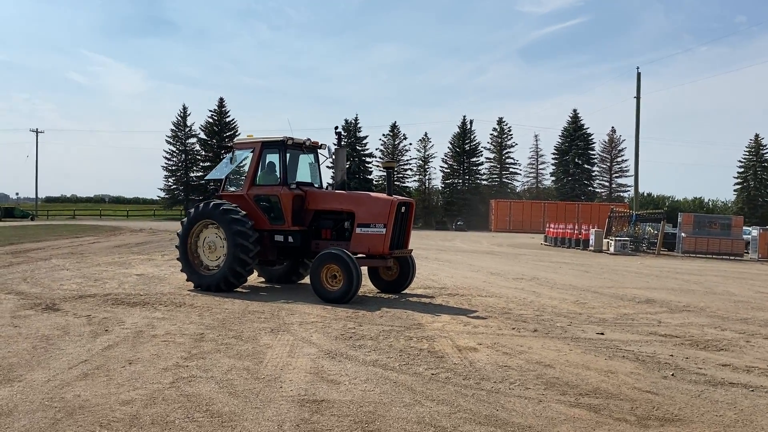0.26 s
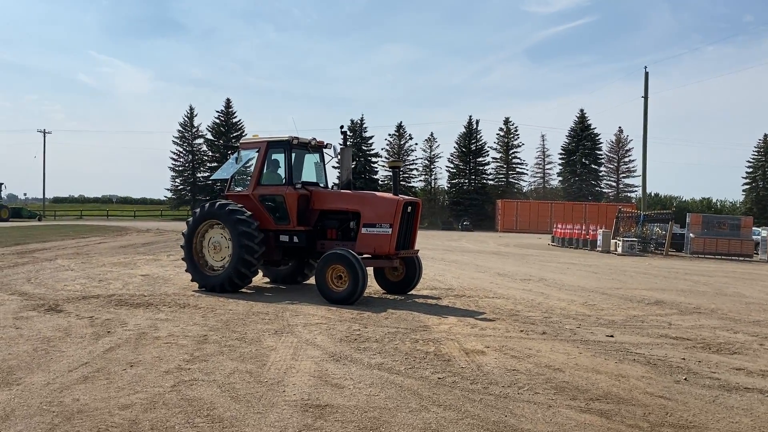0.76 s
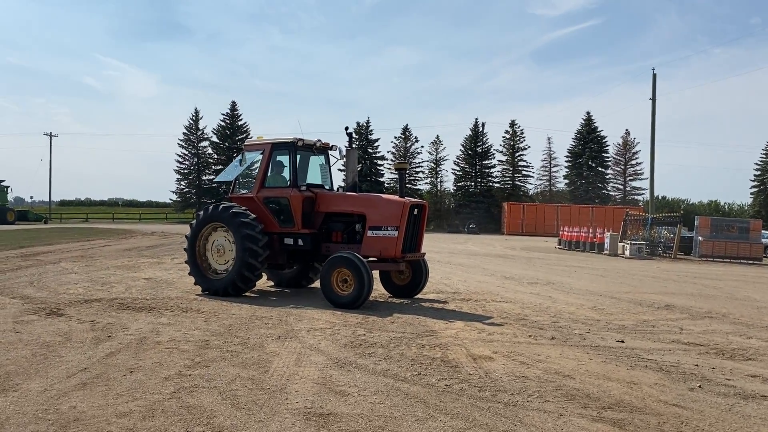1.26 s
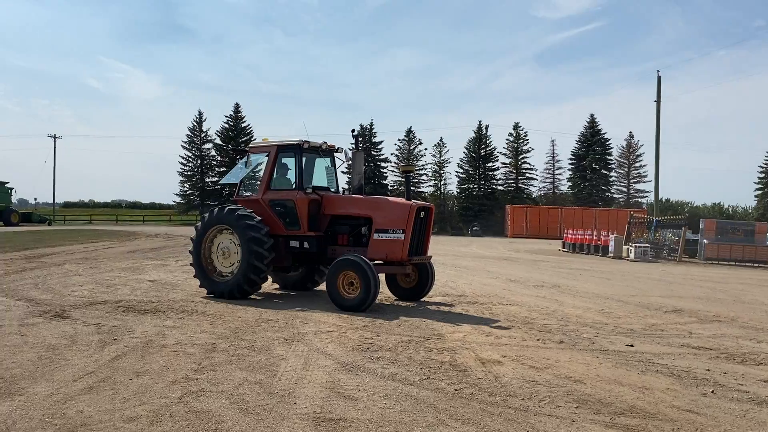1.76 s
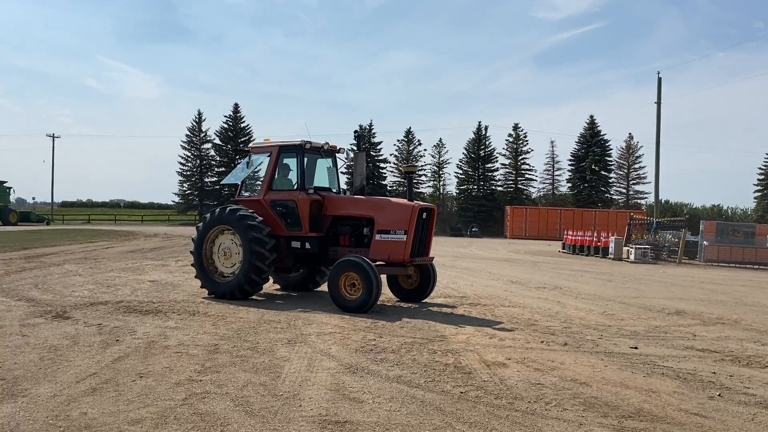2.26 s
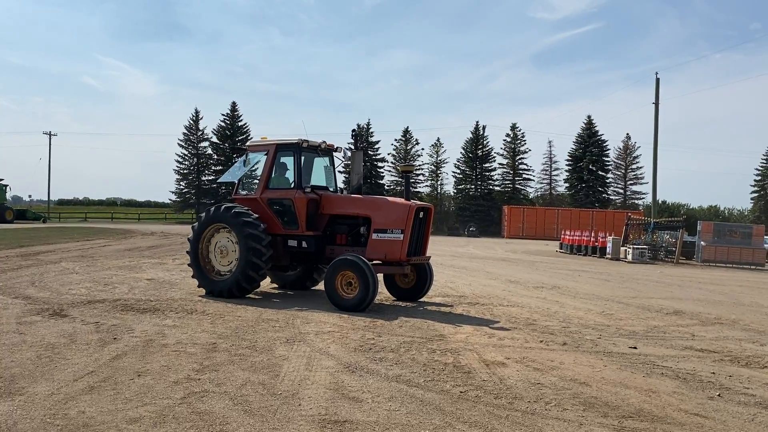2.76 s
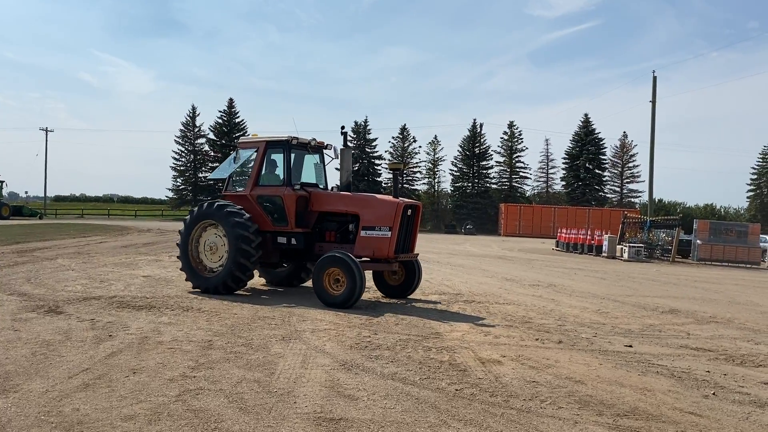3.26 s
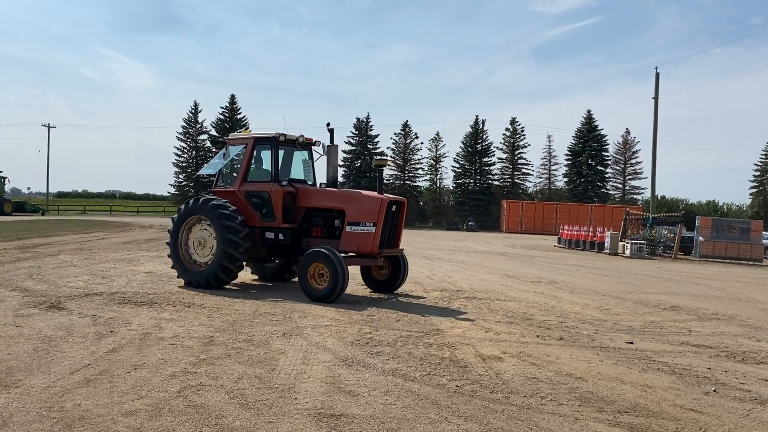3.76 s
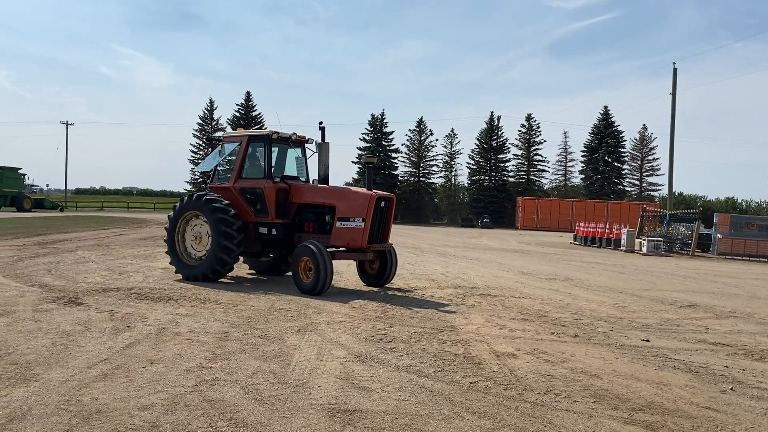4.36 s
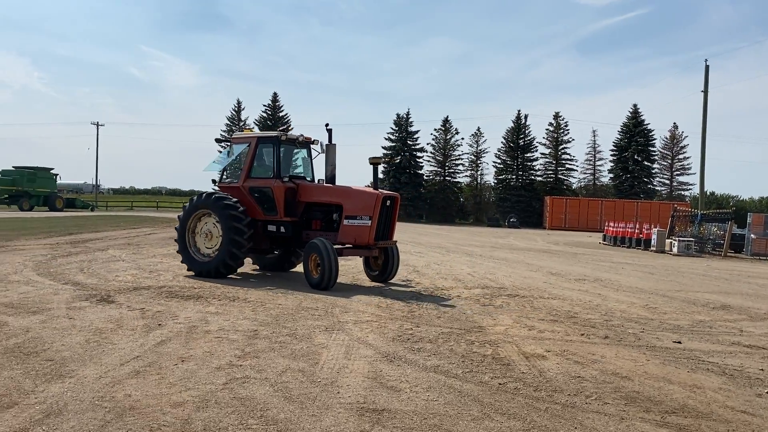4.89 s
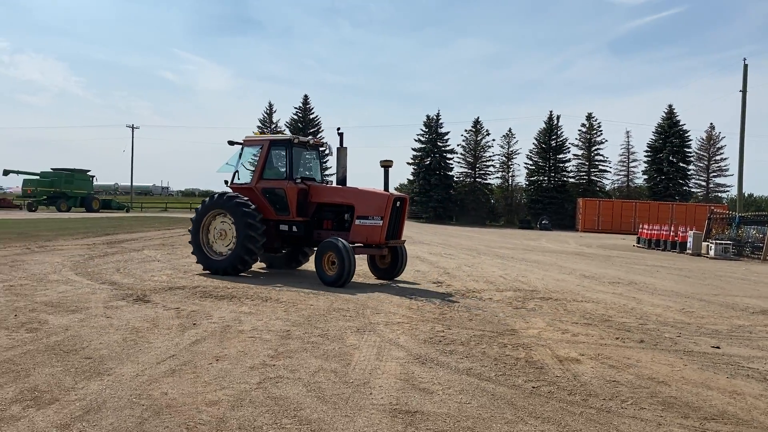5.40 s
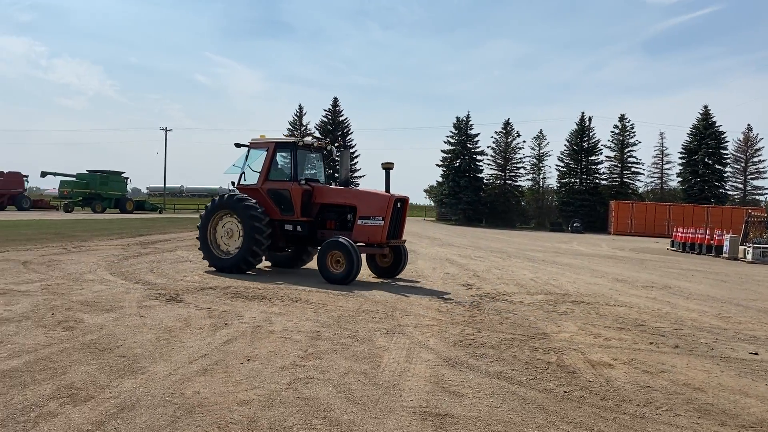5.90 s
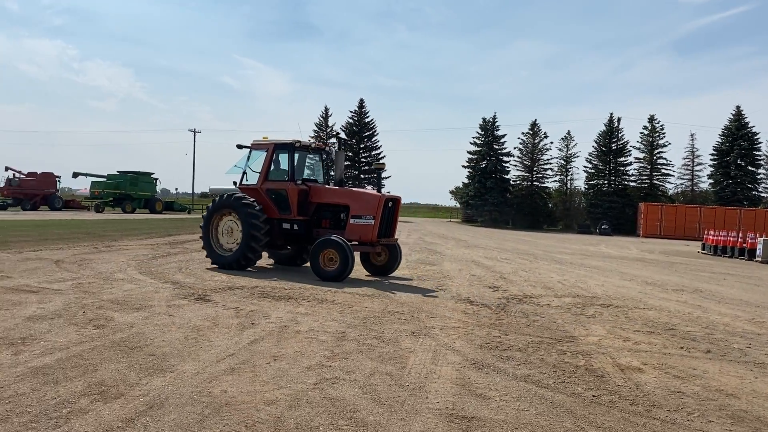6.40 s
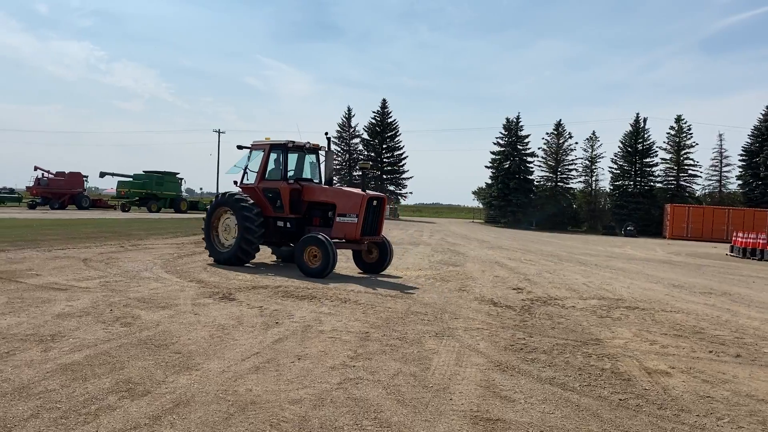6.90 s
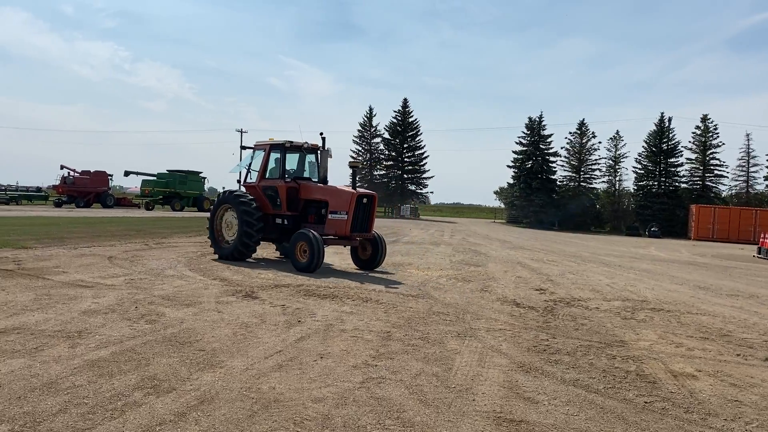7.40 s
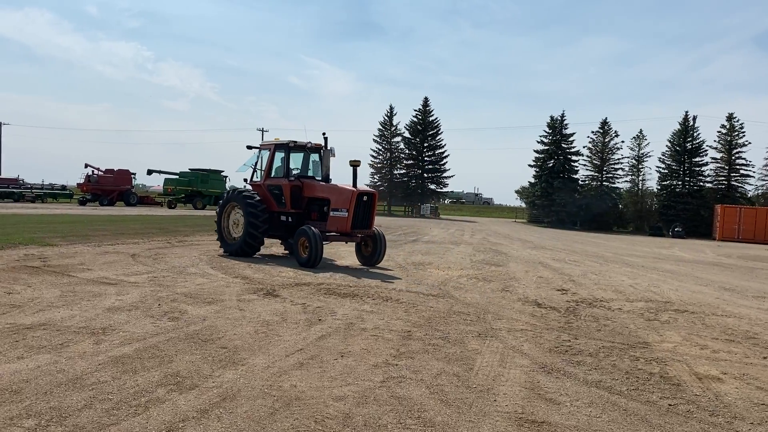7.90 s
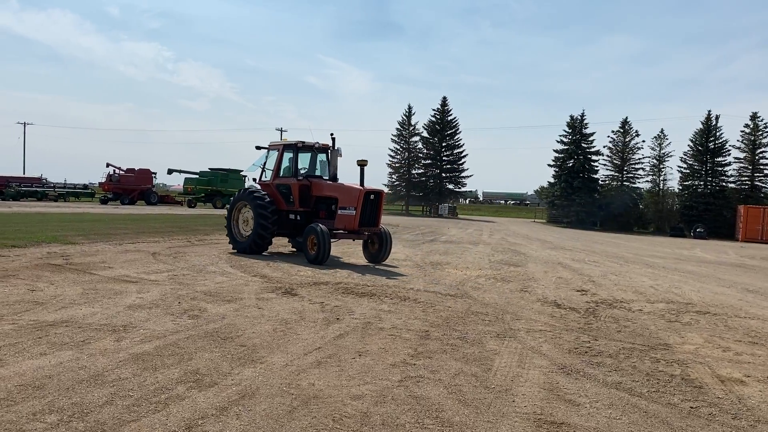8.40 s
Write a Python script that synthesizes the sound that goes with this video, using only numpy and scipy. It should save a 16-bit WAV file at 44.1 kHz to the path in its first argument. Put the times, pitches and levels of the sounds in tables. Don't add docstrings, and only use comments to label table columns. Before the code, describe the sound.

A six-cylinder diesel tractor creeps over a dirt yard, some way from a hand-held stereo microphone. Rapid knocking, valve clatter, exhaust beat and gear whine run throughout, with a buzzy loose cover early. Wind builds to a heavy low boom before four seconds, then the bass is suddenly cut. The engine continues thinner, with ticking, air knocks and fluttering gusts, fading a little at the end.

```python
import sys
import numpy as np
from scipy import signal
from scipy.fft import rfft, irfft, next_fast_len
from scipy.io import wavfile
from scipy.ndimage import uniform_filter1d, minimum_filter1d, map_coordinates

SR = 44100
rng = np.random.default_rng(int(sys.argv[2]) if len(sys.argv) > 2 else 0)


def waveform_to_disk(signal):
    frames = np.transpose(np.atleast_2d(signal))
    scaled = np.clip(frames, -1, 1) * 32767
    samples = np.round(scaled).astype(np.int16)
    wavfile.write(sys.argv[1], SR, samples)


def how_loud(loudness_db):
    steps = np.asarray(loudness_db, float) / 20
    return 10 ** steps


N = 381465


def unit(x):
    return x / np.sqrt(np.mean(x ** 2) + 1e-20)


def along(points, hz):
    f, v = np.transpose(points)
    return np.interp(np.log(hz + 1), np.log(f + 1), v)


def curves(rows, t=None):
    seconds, *columns = np.transpose(rows)
    if t is None:
        t = np.arange(N) / SR
    return [np.interp(t, seconds, column) for column in columns]


def step(s, length, before_db, after_db):
    return curves([(s, before_db), (s + length, after_db)])[0]


def bumps(rows):
    t = np.arange(0, N / SR + .01, .002)
    swells = sum(db * np.exp(-((t - s) / half) ** 2) for s, half, db in rows)
    return np.interp(np.arange(N) / SR, t, swells)


def wobble(rate, count=2000):
    knots = np.linspace(0, N * rate / SR, count)
    smooth = map_coordinates(rng.standard_normal(int(N * rate / SR) + 4), [knots])
    return np.interp(np.arange(N) * rate / SR, knots, smooth)


def filtered(x, response):
    m = next_fast_len(N + 8192)
    return irfft(rfft(x, m) * response(np.fft.rfftfreq(m, 1 / SR)), m)[..., :N]


def coloured(x, spectrum):
    return unit(filtered(x, lambda hz: how_loud(along(spectrum, hz))))


def resonance(hz, centre, width):
    return 1j * hz * width / (centre * centre - hz * hz + 1j * hz * width)


def ring(modes):
    return lambda hz: 1 + sum(how_loud(db) * resonance(hz, c, w) for c, w, db in modes)


# time in seconds, rate in cycles per second.
CYCLE_RATE = [(0, 12.94), (2, 12.93), (2.4, 12.78), (3.1, 12.2), (3.3, 12.14), (3.6, 12.23), (4, 12.26),
              (4.3, 12.2), (4.9, 12.27), (5.15, 12.36), (5.6, 12.33), (6.15, 12.4), (6.75, 12.42),
              (7.1, 12.36), (7.55, 12.82), (8, 12.78), (8.65, 12.96)]
# time in seconds, level in dB.
ENGINE_LEVEL = [(0, -25.5), (.15, -25.5), (.65, -23.5), (1.2, -24.5), (2.5, -23.5), (4, -23), (4.5, -24.5),
                (5.3, -24), (5.5, -26.5), (6.3, -25), (6.75, -25), (7.23, -26), (7.6, -25), (7.93, -27.5),
                (8.45, -28), (8.65, -29)]
# time in seconds, share from 0 to 1.
TURN = [
    (0, 0),
    (.6, 0),
    (2.3, 0.38),
    (3.2, 0.53),
    (4.5, 0.9),
    (6, 0.96),
    (8.65, 0.1),
]
# time in seconds, level in dB.
MOVING_AIR = [(.14, -0.5), (.77, 1), (1.61, 1), (4.19, -2.5), (4.48, 0.5), (5.28, 0.5), (5.35, -1.5),
              (5.61, 3.5), (6.31, -2.5), (6.58, 1.5), (6.74, -3), (7.03, -3), (7.33, 2), (7.39, -2),
              (7.61, -6), (8.31, -1), (8.58, 1)]


def tractor():
    cycle = np.cumsum(curves(CYCLE_RATE)[0]) / SR
    turn = np.clip(curves(TURN)[0], 0, 1)
    block_db = curves(ENGINE_LEVEL)[0]
    mean_db = block_db.mean()
    air_db = bumps([(s, .069, db) for s, db in MOVING_AIR])
    treble_db = mean_db + 0.99 * (block_db - mean_db) + air_db
    block = how_loud(block_db + 2.0) * block_knock(cycle, turn)
    clatter = how_loud(treble_db - 9 + 0.65 * wobble(9)) * valve_clatter(cycle, turn)
    hiss = how_loud(treble_db - 22.5 + 0.72 * wobble(7.6)) * firing_hiss(cycle)
    notes = tones(cycle) * [[1], [-.45]]
    return block + clatter + hiss + notes + rattles(cycle) + tappet(cycle)


def fresh():
    return rng.standard_normal((2, N))


def repeating(cycle, drift, size=2048, count=6):
    morph = np.arange(N) / SR * drift % (count - 1)
    phase = np.angle(rfft(rng.standard_normal((count, size))))
    tables = irfft(np.exp(1j * phase), size)
    return unit(map_coordinates(tables, [morph, cycle % 1 * size], order=1, mode="grid-wrap"))


def steady(cycle, drift):
    return np.array([repeating(cycle, drift), repeating(cycle, drift)])


CYLINDER_DB = [-10.5, -10, -8.5, -18.5, -12.5, -8]


def knocks(cycle, late, sharp, base, scatter_db):
    firing = cycle * len(CYLINDER_DB) + late
    k = firing.astype(int)
    chance_db = scatter_db * rng.standard_normal(N // 400)[k]
    size = how_loud(np.array(CYLINDER_DB)[k % len(CYLINDER_DB)] + chance_db)
    return base + size * np.exp(-sharp * (firing % 1))


# frequency in Hz, ratio in dB.
REPEATS = [(300, -2), (700, 2), (1500, 3.5), (2100, 0), (2800, -5)]
# centre in Hz, width in Hz, level in dB.
PANELS = [(336, 69, -10), (767, 54, -9.5), (903, 60, -7.5), (1033, 150, -10), (1190, 70, -4.5),
          (1302, 48, -3.5), (1641, 24, -11)]
# frequency in Hz, level in dB per Hz.
BLOCK_FIRST = [(30, -45), (65, -6), (150, 3), (235, 0), (340, -1.5), (620, -5), (900, -4.5), (1250, -4),
               (1500, -8.5), (1950, -6.5), (2250, -10.5), (2650, -10), (2950, -22.5), (4500, -39)]
# frequency in Hz, level in dB per Hz.
BLOCK_SECOND = [(30, -45), (65, -8), (150, 0), (235, -4), (340, -7.5), (620, -4.5), (800, -3), (1250, -3.5),
                (1600, -3), (1950, -5.5), (2250, -9), (2650, -11.5), (2950, -18), (4500, -44)]


def block_knock(cycle, turn):
    def share(sign):
        return lambda hz: 1 / np.sqrt(1 + how_loud(-2 * sign * along(REPEATS, hz)))

    noise = filtered(steady(cycle, .85), share(1)) + filtered(fresh(), share(-1))
    block = noise * knocks(cycle, .3, sharp=3, base=.4, scatter_db=1.3)
    block = filtered(block, ring(PANELS))
    return (1 - turn) * coloured(block, BLOCK_FIRST) + turn * coloured(block, BLOCK_SECOND)


# centre in Hz, width in Hz, level in dB.
COVERS = [
    [(4400, 410, 4.5), (6100, 150, 0)],
    [(4410, 120, 5.5), (4690, 140, 7.5), (6460, 710, -2.5)],
]
# frequency in Hz, level in dB per Hz.
CLATTER = [(2000, 0.5), (2700, 0), (3500, -3), (4400, -6), (5400, -3), (6200, -9.5), (7000, -13.5),
           (8200, -22), (9500, -36)]


def valve_clatter(cycle, turn):
    noise = .3 * steady(cycle, .45) + .95 * fresh()
    clatter = noise * knocks(cycle, 2.4, sharp=3, base=.55, scatter_db=3.5)
    first, second = (filtered(clatter, ring(cover)) for cover in COVERS)
    return coloured((1 - turn) * first + turn * second, CLATTER)


# frequency in Hz, level in dB per Hz.
HISS = [(7000, -17.5), (7800, -1), (10000, -6), (12000, -15.5), (14000, -11), (15200, -16), (15800, -38)]


def firing_hiss(cycle):
    return coloured(fresh() * knocks(cycle, 5.55, sharp=2.6, base=0.54, scatter_db=6.5), HISS)


def heard(comes, leaves, before_db, facing_db, after_db):
    swing = 0.36
    return curves([(comes, before_db), (comes + swing, facing_db),
                   (leaves, facing_db), (leaves + swing, after_db)])[0]


def order_note(cycle, order, db, sway_db):
    level = np.sqrt(2) * how_loud(db + sway_db * wobble(2.6))
    return level * np.sin(2 * np.pi * (order * cycle + rng.random()))


EXHAUST_ORDERS = [5, 6, 7, 10, 13, 16, 20, 26, 27]
EXHAUST_DB = [-65, -26.5, -40, -44, -39.5, -39, -41.5, -37.5, -39.5]
# comes in s, leaves in s, level before in dB, facing in dB and after in dB.
BEAT_HEARD = (1, 3.5, -22, 1.5, -8)
FAN_HEARD = (0.5, 3, -21, -22, -37.5)
GEAR_HEARD = (4.4, 6.2, -42, -33.5, -46)
PIPE_HEARD = (2.5, 4, -58, -38, -50)
# order, comes in seconds, leaves in seconds, level in dB rms.
WHINES = [(32, -1, 2.4, -44), (52, -1, 2.2, -45), (55, -1, 2.4, -45), (65, 3.3, 4.8, -39),
          (123, .6, 2.4, -44), (123, 4.8, 6.2, -43), (44, -1, 2.4, -44), (62, -1, 2.3, -41),
          (67, -1, 2.4, -43), (69, -1, 2.5, -40), (70, 2.5, 4.9, -40), (74, -1, 2.6, -40),
          (75, 3, 4.5, -43), (81, 2.4, 3.1, -41), (81, 4.8, 7.2, -43), (86, 2.6, 6, -40), (89, -1, 6, -44),
          (90, 4.8, 6.6, -42), (91, -1, 2, -43), (93, -1, 2.6, -38), (95, 2.6, 3.9, -41),
          (96, 2.6, 5.8, -40), (98, -1, 4.8, -41), (99, 2.2, 5.8, -38), (99, 7, 7.7, -39),
          (100, -1, 2, -43), (101, 5, 5.9, -40), (104, 2.6, 6.6, -40), (105, -1, 2.2, -42),
          (106, 2.6, 6.2, -42), (107, 2.6, 5, -42), (108, 5, 6.2, -42), (111, 6, 7.1, -41),
          (117, 5.8, 6.8, -41), (132, 2.6, 4.9, -41)]


def tones(cycle):
    beat_db = heard(*BEAT_HEARD)
    fan_db = heard(*FAN_HEARD)
    exhaust = sum(order_note(cycle, k, db + beat_db * (k < 8), 1.5)
                  for k, db in zip(EXHAUST_ORDERS, EXHAUST_DB))
    fan = sum(order_note(cycle, 11.82 * (k + 1), fan_db + db, .5)
              for k, db in enumerate([0, -21, -23]))
    whine = sum(order_note(cycle, k, heard(comes, leaves, db - 16, db, db - 16), 1.5)
                for k, comes, leaves, db in WHINES)
    gear = order_note(cycle, 72, heard(*GEAR_HEARD), 2.0)
    pipe = order_note(cycle, 48, heard(*PIPE_HEARD), 1.0)
    return exhaust + whine + fan + gear + pipe


# centre in Hz, width in Hz.
RATTLES = [(4240, 210), (4480, 240)]
# comes in s, leaves in s, level before in dB, facing in dB, after in dB.
RATTLES_HEARD = [
    (.45, 2.9, -68, -42.5, -60),
    (4.6, 5.95, -63, -40.5, -47.5),
]
# centre in seconds, half length in seconds, change in dB.
RATTLE_SWELLS = [
    (.78, 0.087, 5),
    (1.08, .08, 4),
    (1.42, .15, 4.5),
    (1.85, .06, -3),
    (2.05, .1, 1),
    (2.27, .06, -3),
    (2.6, 0.067, 6),
    (5.27, 0.054, 4),
    (5.42, .07, -6),
]


def rattles(cycle):
    out = 0
    for (centre, width), row in zip(RATTLES, RATTLES_HEARD):
        shake = fresh() * knocks(cycle, 2.4, sharp=2.1, base=0.39, scatter_db=4.5)
        buzz = unit(filtered(shake, lambda hz: resonance(hz, centre, width)))
        out = out + how_loud(heard(*row) + bumps(RATTLE_SWELLS) + 0.76 * wobble(10.0)) * buzz
    return out


# time in seconds, level in dB.
TAPPET_HEARD = [
    (4.9, -60),
    (5.15, -42.5),
    (5.3, -48),
    (5.4, -58),
    (5.55, -43),
    (5.95, -40.5),
    (6.15, -45),
    (6.4, -60),
]


def tappet(cycle):
    since = (cycle - cycle[round(5.715 * SR)]) % 1
    burst = fresh() * np.exp(-14 * since) * how_loud(2.7 * wobble(12))
    return how_loud(curves(TAPPET_HEARD)[0]) * unit(filtered(burst, lambda hz: resonance(hz, 4490, 150)))


# frequency in Hz, coherence from 0 to 1.
ALIKE = [(60, 0.48), (600, 0.89), (2000, 0.81), (3500, 0.99), (5000, 0.77), (7000, 1), (8200, 0.92),
         (15000, 0.51)]
# frequency in Hz, left minus right in dB.
TILT = [(60, 10.5), (110, 3), (200, 1), (380, 0), (700, -0.5), (1290, 0), (2380, -2), (4400, 3),
        (8120, 3.5), (15000, -3)]
# frequency in Hz, left's lead in radians.
LEAD = [(0, 0), (1500, .1), (2800, 1.5), (4100, 1.2), (5400, 2.5), (6250, .75), (7100, -.6), (8000, -2.9),
        (8700, -3.4), (9650, -6.2), (10600, -6.4), (11400, -9.2), (12700, -9.6), (13300, -12.4),
        (14600, -12.7), (15200, -15.7)]


def ports(pair):
    def angle(hz):
        return np.arccos(np.clip(along(ALIKE, hz), 0, 1)) / 2

    def half(hz):
        return how_loud(along(TILT, hz) / 2) * np.exp(.5j * np.interp(hz, *np.transpose(LEAD)))

    mid, side = filtered(pair, lambda hz: np.array([np.cos(angle(hz)), np.sin(angle(hz))]))
    left_right = np.array([mid + side, mid - side])
    return filtered(left_right, lambda hz: np.array([half(hz), 1 / half(hz)]))


# time in seconds, level in dB.
WIND = [(0, -54), (.45, -39), (.8, -32), (1.4, -25.5), (3.1, -23), (3.45, -13.5), (3.86, -12.5),
        (4.02, -23.5), (5.5, -22), (6.25, -20), (6.9, -26.5), (7.2, -16), (7.76, -21.5), (7.84, -28),
        (7.87, -21), (8.65, -22)]
# centre in seconds, half length in seconds, change in dB.
GUSTS = [(0, .03, 22), (.57, .07, 7.5), (1.1, 0.063, 6.5), (1.17, 0.044, -13), (2.33, 0.055, -9),
         (3.29, 0.014, -6), (3.36, 0.05, -2.5), (3.47, .06, -5), (3.57, .02, -5), (3.61, 0.027, 0),
         (3.84, .05, 1.5), (4.04, 0.13, 6.5), (4.39, 0.049, 3), (4.73, 0.07, 3), (4.97, 0.014, 5.5),
         (5.11, 0.026, 3.5), (5.265, 0.05, 11), (5.4, 0.086, 7), (5.575, 0.021, -11), (5.635, .035, 9),
         (5.715, 0.01, 6), (5.78, .04, -4), (5.86, 0.021, 7), (5.93, 0.016, 8), (6.02, 0.024, 7),
         (6.14, 0.038, 7), (7.54, 0.057, 7.5), (7.66, .02, 1)]
# frequency in Hz, level in dB per Hz.
RUMBLE = [(20, -30), (40, 4.5), (65, 4.5), (120, -0.5), (200, -3), (400, -17.5), (800, -76)]
# frequency in Hz, level in dB per Hz.
FLUTTER = [(80, -43), (160, -4), (300, 6), (480, 1.5), (650, -5.5), (1000, -17.5), (2000, -23), (3500, -65)]
# time in seconds, left minus right in dB.
WINDWARD = [
    (0, -14),
    (3, -3.5),
    (3.7, 2),
    (4.5, 0),
    (7, 1),
    (7.6, 3.5),
    (8.65, 13),
]


def wind():
    strength_db = curves(WIND)[0] + bumps(GUSTS)
    rumble_db = strength_db + step(3.87, .04, -1.5, -9.5)
    flutter_db = strength_db + step(3.45, .34, -23.5, -4)
    rumble = how_loud(rumble_db) * buffet(RUMBLE, 40, lump_db=1.5, apart=.35)
    flutter = how_loud(flutter_db) * buffet(FLUTTER, 130, lump_db=2.5, apart=.4)
    balance = how_loud(curves(WINDWARD)[0] * [[.5], [-.5]])
    return (rumble + flutter + thumps()) * balance + pops()


def buffet(spectrum, rate, lump_db, apart):
    a, b = (how_loud(lump_db * wobble(rate)) * rng.standard_normal(N) for _ in "ab")
    return coloured(np.array([a + apart * b, a - apart * b]), spectrum)


# centre in seconds, peak in dB, frequency in Hz.
THUMPS = [(3.362, -4, 80), (3.384, -10, 92), (3.412, -13, 135), (3.54, -9, 125), (3.606, -6.5, 294),
          (3.620, -8, 280), (3.676, -13, 310), (3.706, -9, 90), (3.74, -13, 90), (3.75, -10, 350),
          (3.807, -7, 95), (3.834, -12, 115), (3.857, -6, 125), (3.859, -5, 280), (3.877, -17, 400),
          (5.215, -10, 300), (5.255, -12, 400), (5.272, -8, 430), (5.292, -10, 426), (5.364, -13, 400),
          (5.380, -10, 560), (5.425, -15, 480), (5.468, -17, 520), (5.619, -13, 380), (5.631, -14, 650),
          (5.647, -12, 400), (5.659, -11, 380), (5.716, -9, 330), (7.205, -9, 380), (7.292, -6, 330),
          (7.368, -8, 400), (7.463, -12, 500), (7.518, -9, 400), (7.535, -12, 430), (7.552, -2, 400),
          (7.569, -18, 540), (7.588, -8, 380), (7.699, -11, 557), (7.724, -10, 600), (8.432, -11, 730)]


def thumps():
    out = np.zeros(N)
    for s, db, hz in THUMPS:
        swing = (np.arange(SR // 20) / SR - .025) * hz
        window = np.cos(np.pi * np.clip(swing / 2.84, -.5, .5)) ** 2
        out[round((s - .025) * SR):][:len(swing)] -= how_loud(db) * window * np.cos(2 * np.pi * swing)
    return out


# start in seconds, peak in dB, left minus right in dB.
POPS = [(4.779, -15, 1), (4.969, -27, -3), (5.269, -15, 1), (5.288, -21, 6), (5.629, -33, -2),
        (6.149, -30, 2), (7.329, -16, 1), (7.454, -14, 3), (7.566, -14, 8), (7.699, -17, 5),
        (7.721, -15, 5), (7.758, -17, -10), (7.765, -16, 0), (7.782, -18, 2), (7.799, -18, 5.5),
        (7.83, -18, 2), (8.139, -29, -5), (8.423, -12, -3), (8.436, -13, 4), (8.469, -16, 1.5)]


def pops():
    out, t = np.zeros((2, N)), np.arange(SR // 25) / SR
    snap = t / .0002
    for s, db, pan_db in POPS:
        burst = rng.standard_normal((2, len(t))) * how_loud(-60 * t / .025) * (1 - np.exp(-t / .001))
        burst = burst + how_loud(2) * snap * (1 - snap / 2) * np.exp(-snap)
        level = how_loud(db + 22.0 + np.array([[pan_db], [-pan_db]]) / 2)
        out[:, round(s * SR):][:, :len(t)] += level * burst
    return filtered(out, lambda hz: 1 / (1 + 1j * hz / 1400) ** 4)


def scene():
    return ports(tractor()) + wind()


# time in s, loss in dB per octave under the knee, knee in Hz, cliff in dB per octave, deepest cut in dB.
SHELF = [
    (3.88, 0, 695, 61, 58),
    (4.02, 7.5, 650, 66, 55),
    (5.1, 7, 694, 58, 55),
    (5.4, 8, 800, 52, 58),
    (7.05, 6, 765, 58, 53),
    (7.3, 7.5, 694, 55, 52),
    (7.815, 7, 736, 51, 45),
    (7.86, 6, 1650, 205, 73),
    (8.65, 4, 1650, 200, 75),
]
# time in seconds, cut-off in Hz.
EDGE = [(3.88, 44), (3.93, 126), (4.45, 99), (4.72, 116), (4.86, 184), (5.14, 139), (5.35, 195), (5.8, 205),
        (5.95, 125), (6.9, 110), (7.12, 156), (7.36, 127), (7.48, 206), (7.78, 170), (7.86, 397),
        (8.02, 580), (8.42, 425), (8.65, 530)]
# centre in seconds, half length in seconds, shift in dB.
SLACK = [(4.5, .06, -9), (4.8, 0.017, -3), (5.2, .03, -2.5), (5.64, 0.014, -7), (4.66, .03, -4),
         (8.3, 0.08, -1), (8.52, .06, -1.5), (8.14, .05, .5), (5.9, 0.027, -0.5), (6.9, 0.042, -4),
         (7.33, 0.015, -1.5), (7.81, 0.015, 3.5), (7.92, 0.022, -1.5), (8.435, 0.02, -1.5)]


def wind_filter(x, size=2048):
    hz, t, z = signal.stft(x, SR, nperseg=size, noverlap=size * 3 // 4)

    def octaves_under(edge):
        return np.maximum(np.log2(edge / (hz[:, None] + 1)), 0)

    slope_db, knee, cliff_db, deepest_db = curves(SHELF, t)
    slack_db = bumps(SLACK)[np.minimum(t * SR, N - 1).astype(int)]
    jitter_db = 0.42 * rng.standard_normal(len(t))
    edge = curves(EDGE, t)[0] * how_loud(jitter_db + slack_db)
    under = octaves_under(knee)
    drop = 0.36 * np.minimum(under / 0.1, 1)
    loss = slope_db * (under + drop) + cliff_db * octaves_under(1.233 * edge)
    z = z * how_loud(-np.minimum(loss, deepest_db))
    return signal.istft(z, SR, nperseg=size, noverlap=size * 3 // 4)[1][:, :N]


def limiter(x, top, size=441):
    need = np.minimum(top / (np.abs(x).max(0) + 1e-9), 1)
    return x * uniform_filter1d(minimum_filter1d(need, 2 * size), size)


def band_limit(x):
    return signal.sosfilt(signal.butter(12, 15770, fs=SR, output="sos"), x)


def record(dry):
    mix = limiter(wind_filter(dry), top=1.0)
    return band_limit(mix)


dry = scene()
out = record(dry)
waveform_to_disk(out)
```